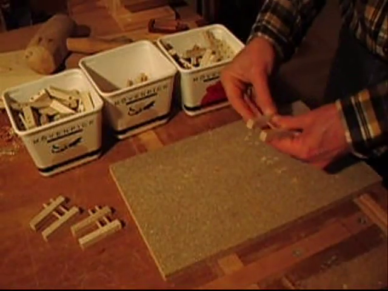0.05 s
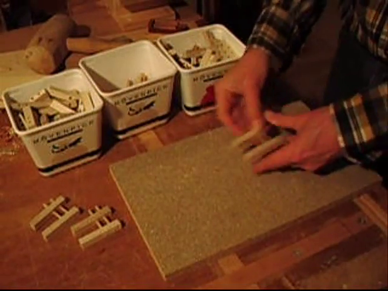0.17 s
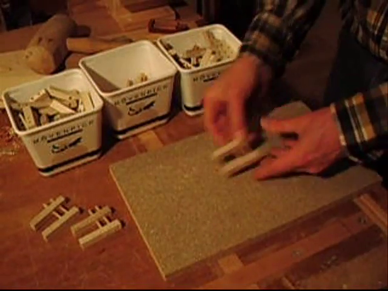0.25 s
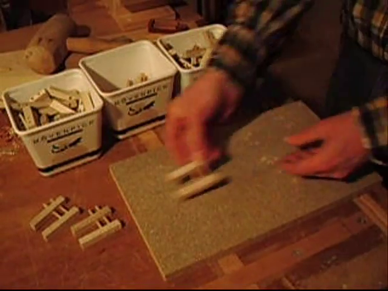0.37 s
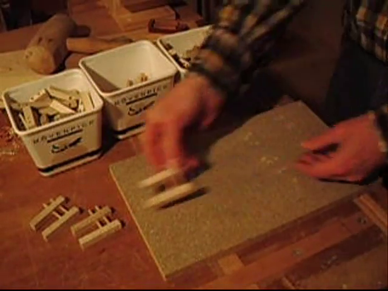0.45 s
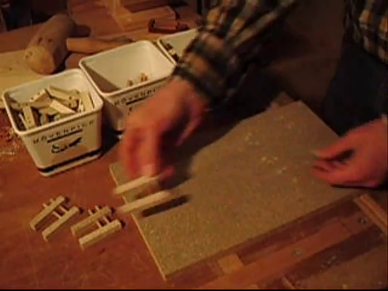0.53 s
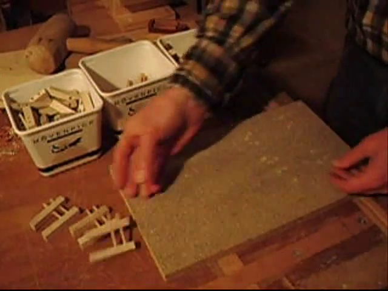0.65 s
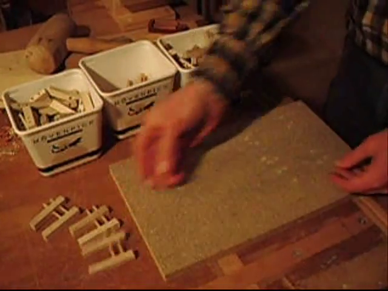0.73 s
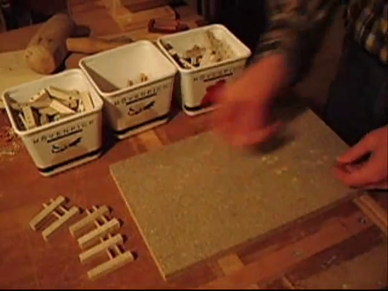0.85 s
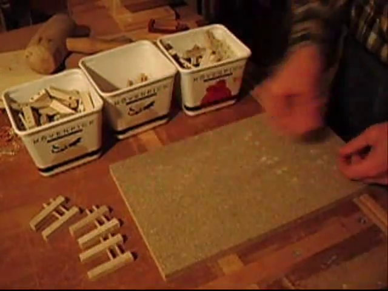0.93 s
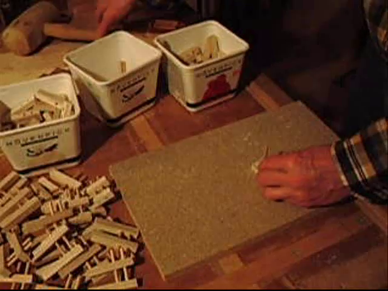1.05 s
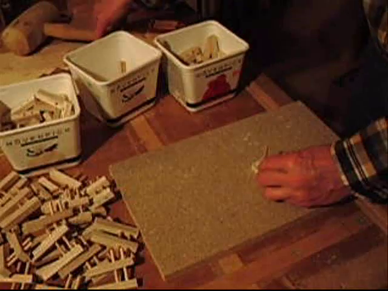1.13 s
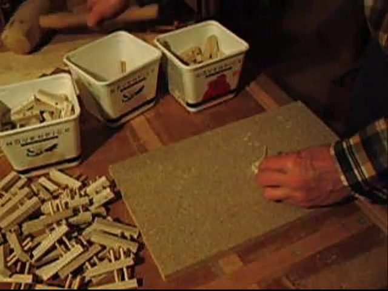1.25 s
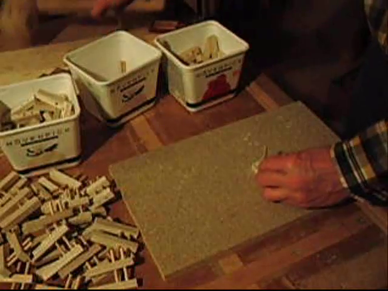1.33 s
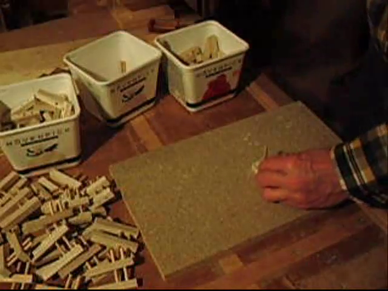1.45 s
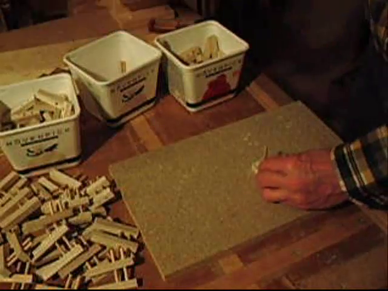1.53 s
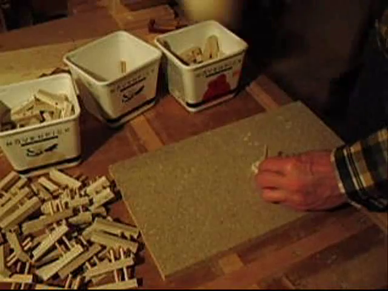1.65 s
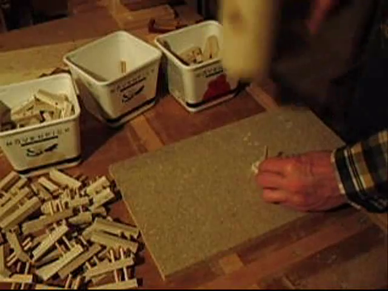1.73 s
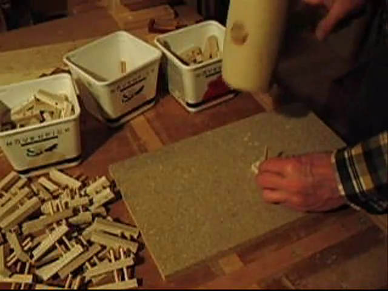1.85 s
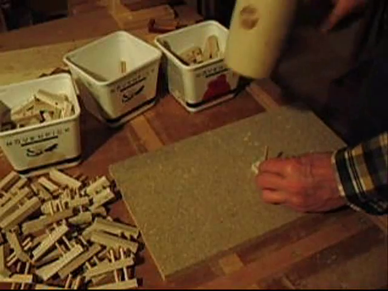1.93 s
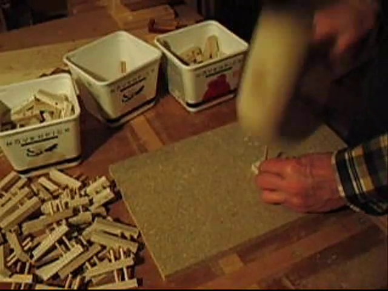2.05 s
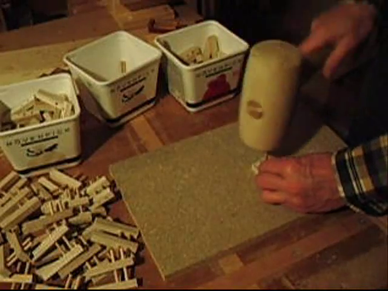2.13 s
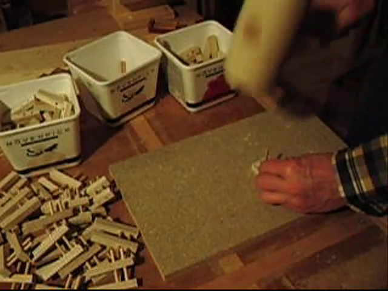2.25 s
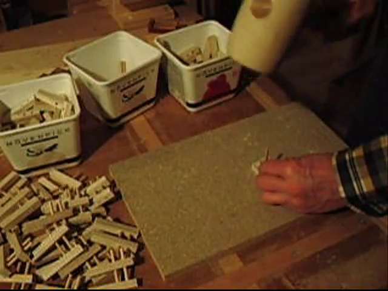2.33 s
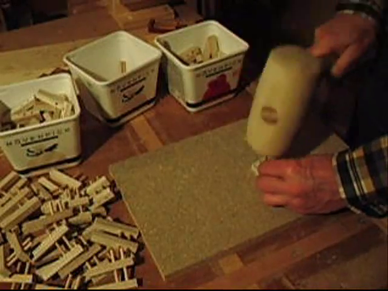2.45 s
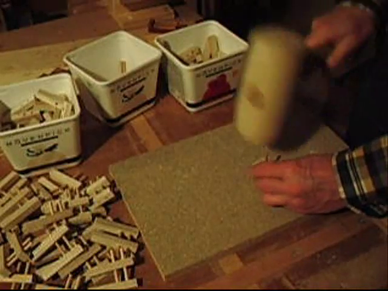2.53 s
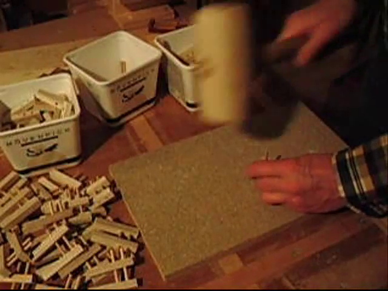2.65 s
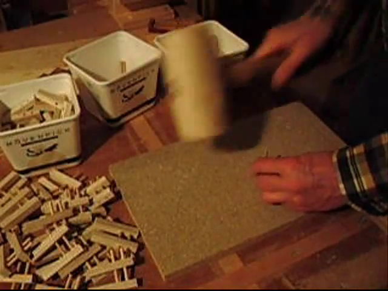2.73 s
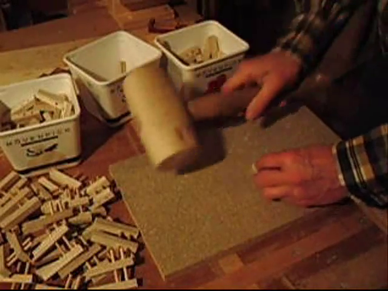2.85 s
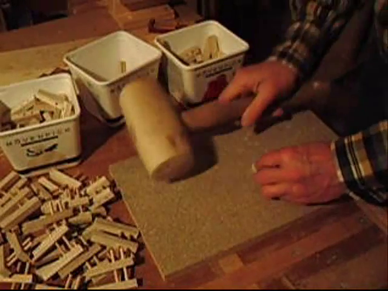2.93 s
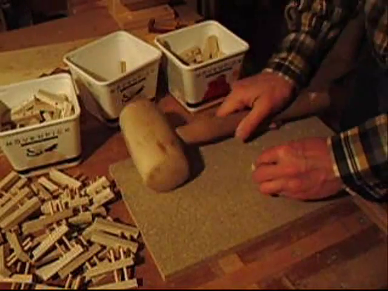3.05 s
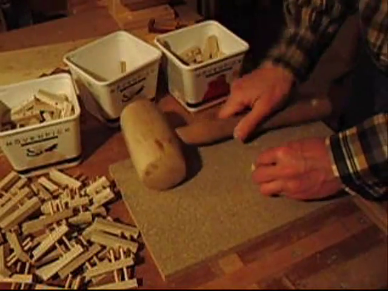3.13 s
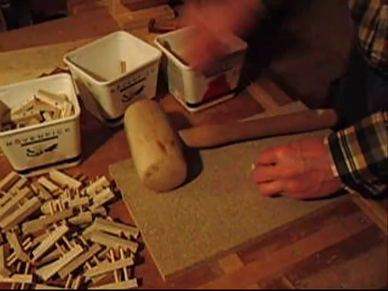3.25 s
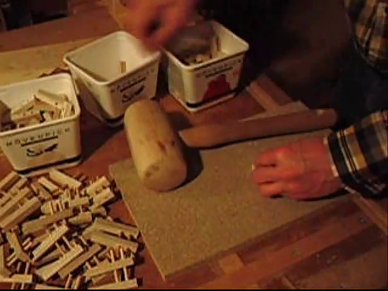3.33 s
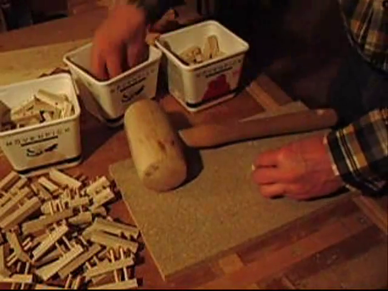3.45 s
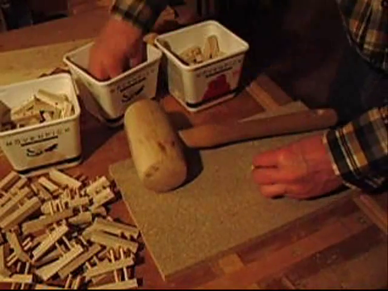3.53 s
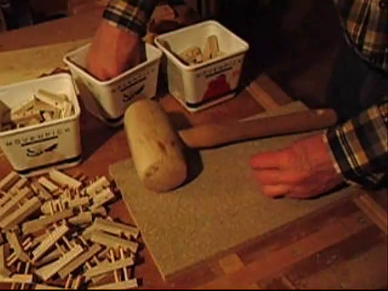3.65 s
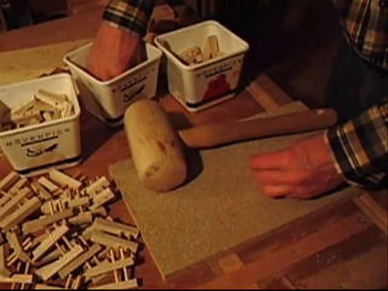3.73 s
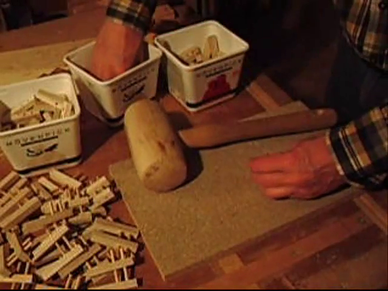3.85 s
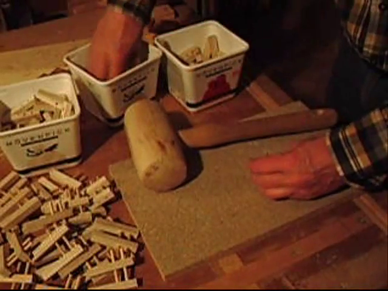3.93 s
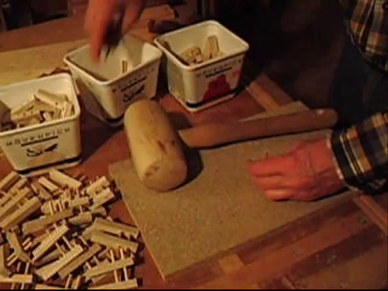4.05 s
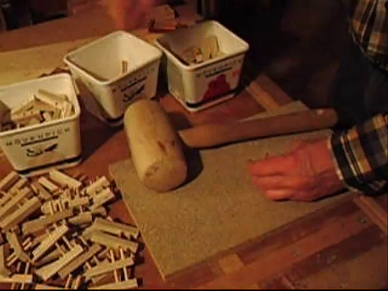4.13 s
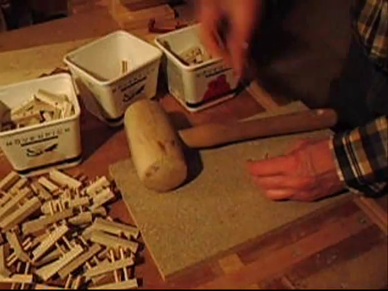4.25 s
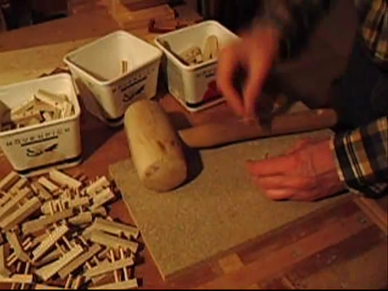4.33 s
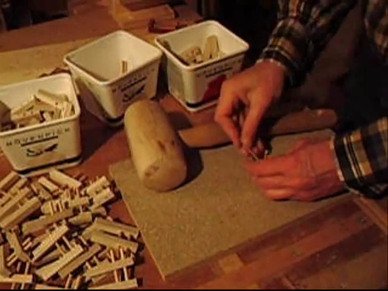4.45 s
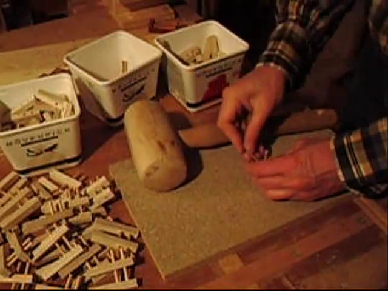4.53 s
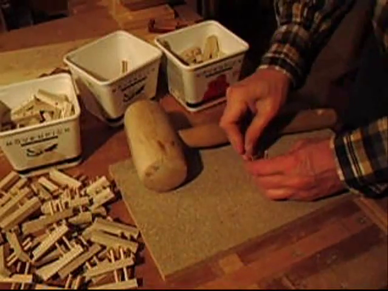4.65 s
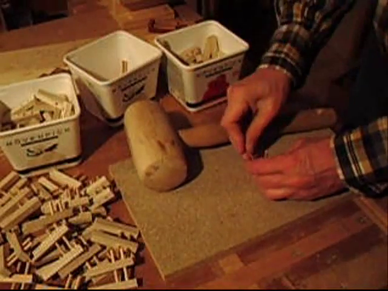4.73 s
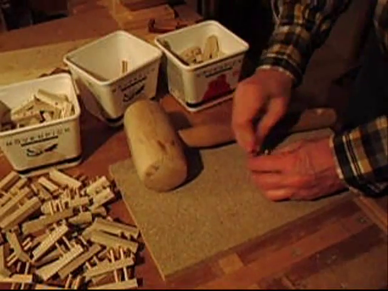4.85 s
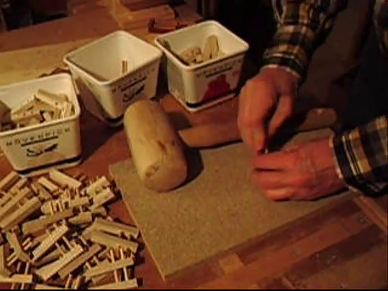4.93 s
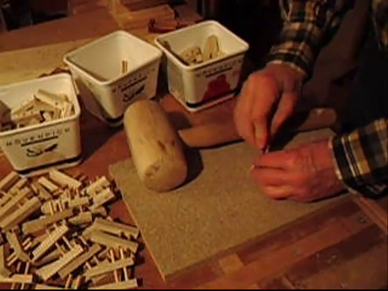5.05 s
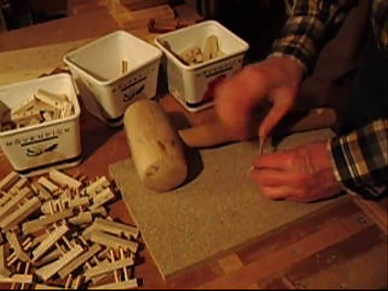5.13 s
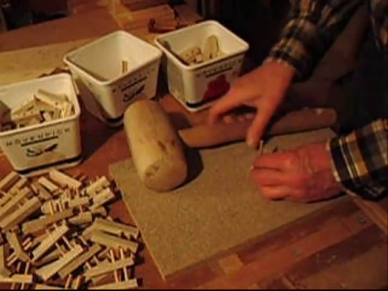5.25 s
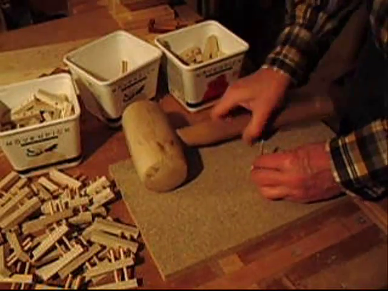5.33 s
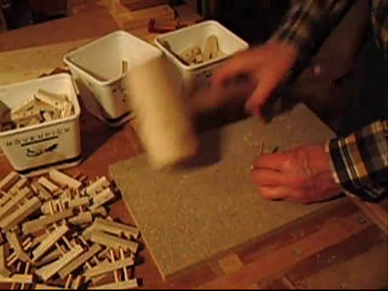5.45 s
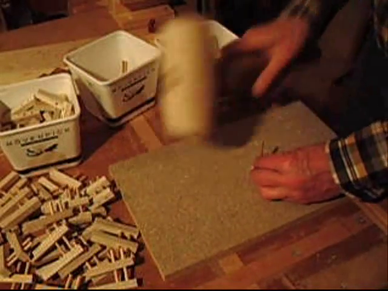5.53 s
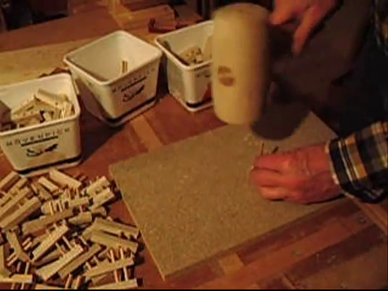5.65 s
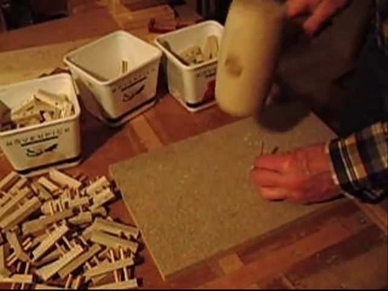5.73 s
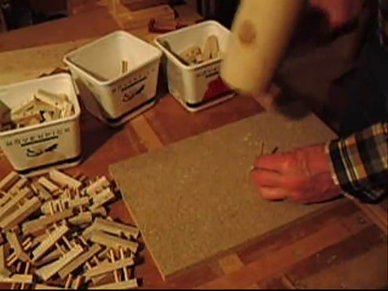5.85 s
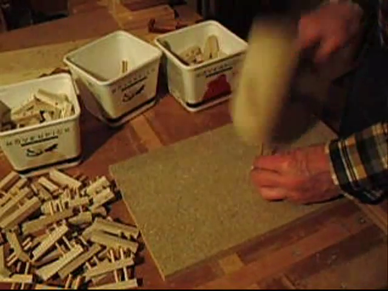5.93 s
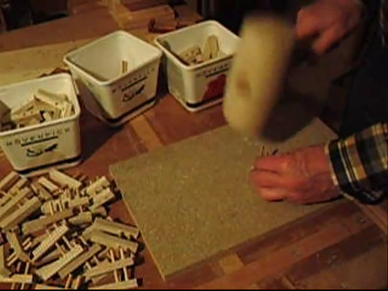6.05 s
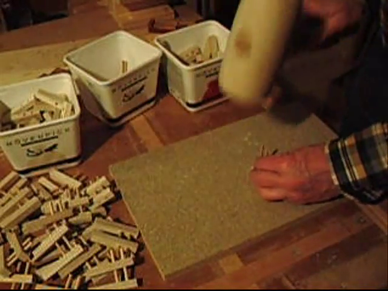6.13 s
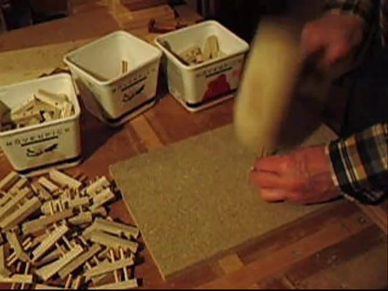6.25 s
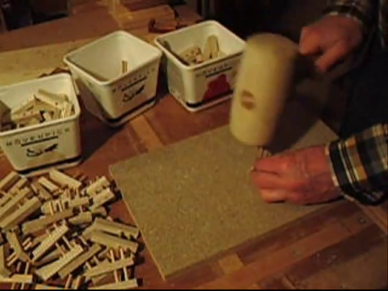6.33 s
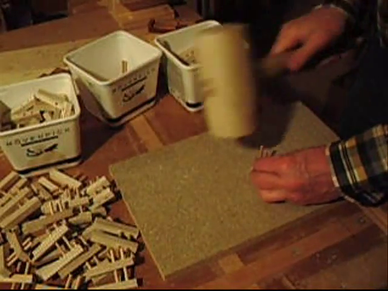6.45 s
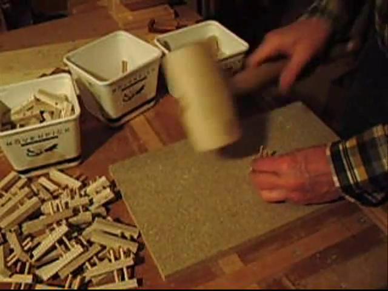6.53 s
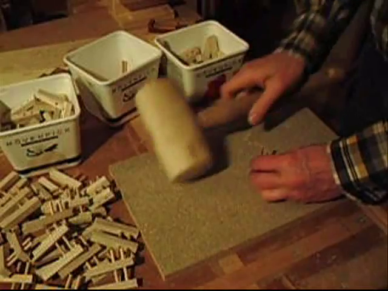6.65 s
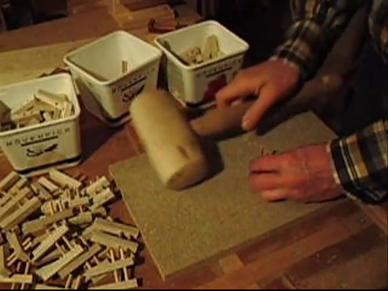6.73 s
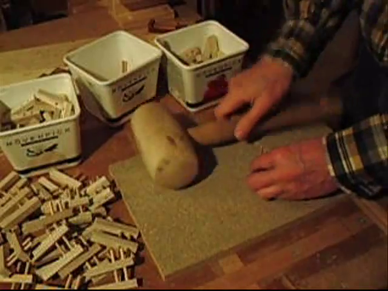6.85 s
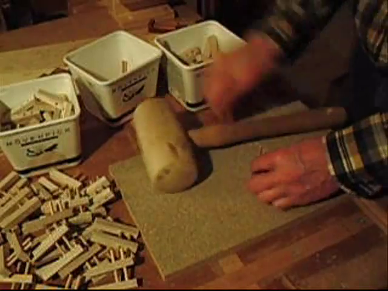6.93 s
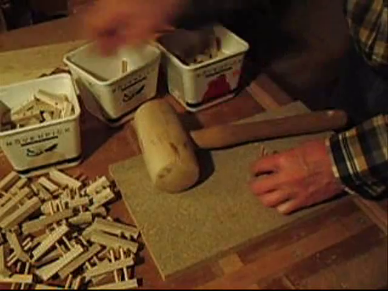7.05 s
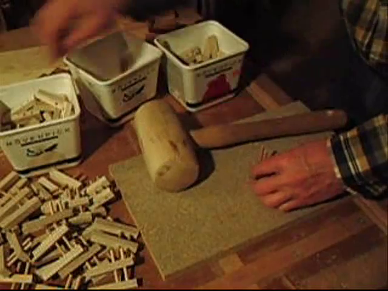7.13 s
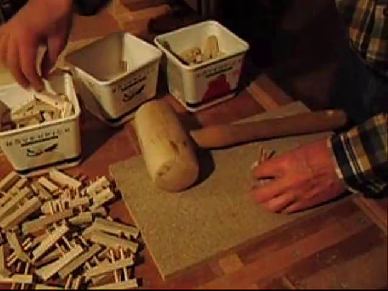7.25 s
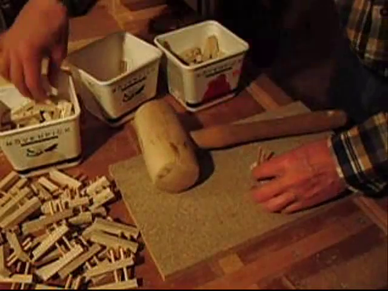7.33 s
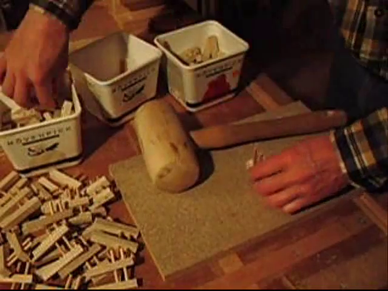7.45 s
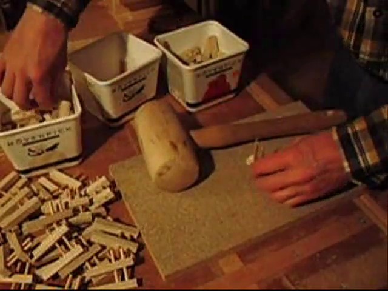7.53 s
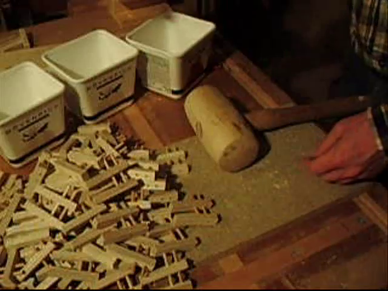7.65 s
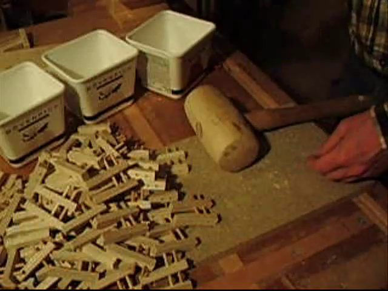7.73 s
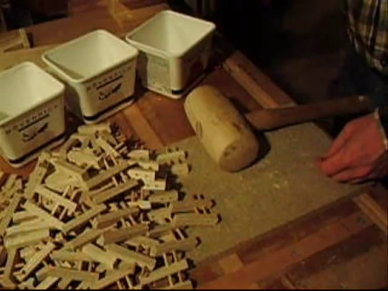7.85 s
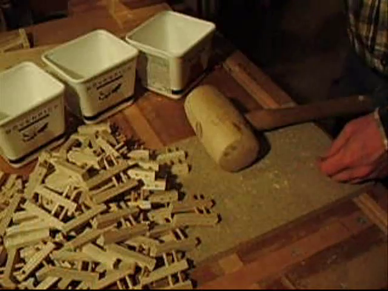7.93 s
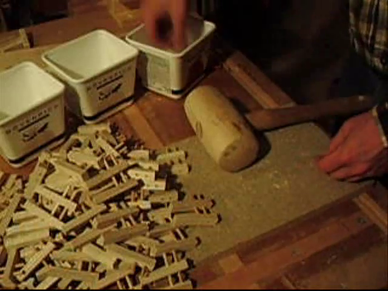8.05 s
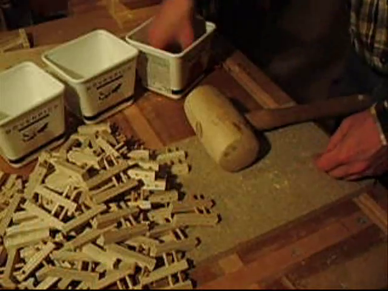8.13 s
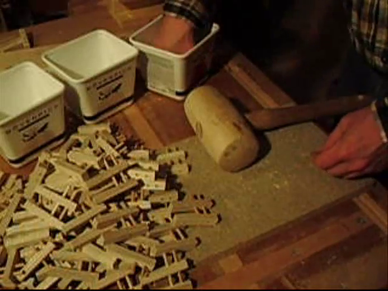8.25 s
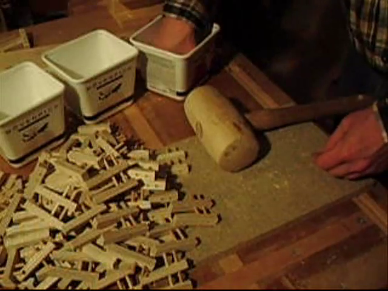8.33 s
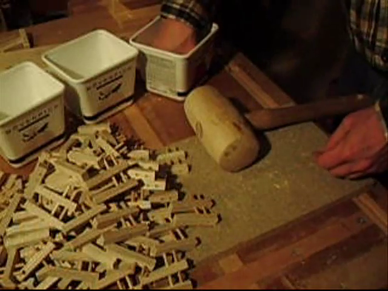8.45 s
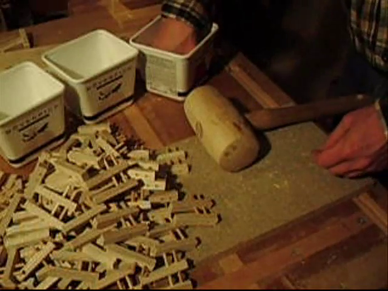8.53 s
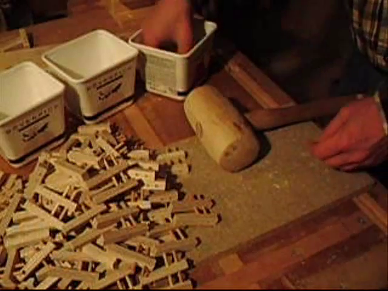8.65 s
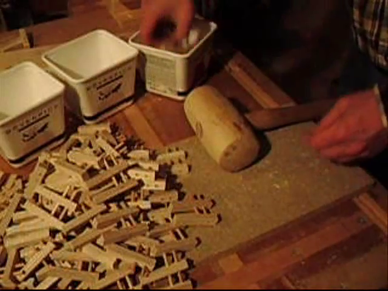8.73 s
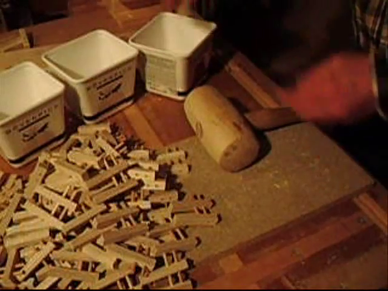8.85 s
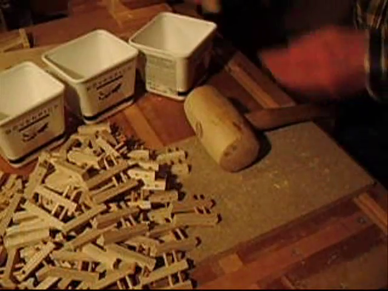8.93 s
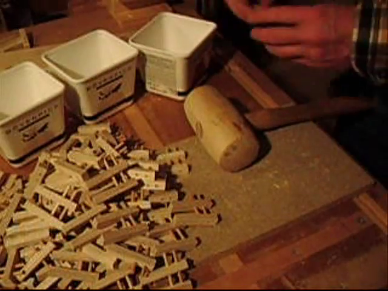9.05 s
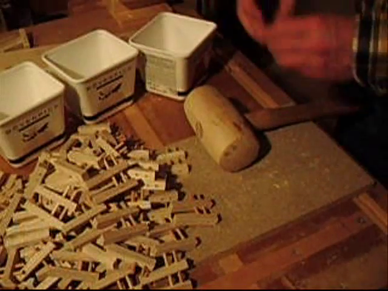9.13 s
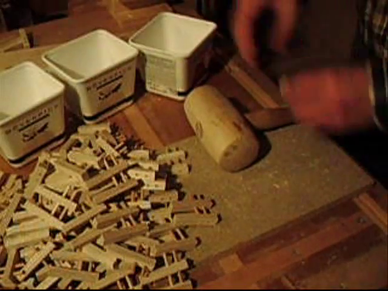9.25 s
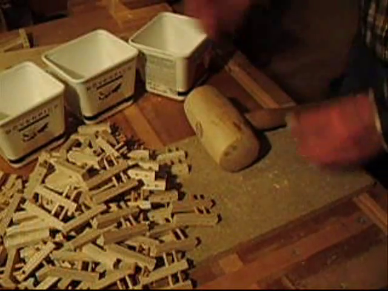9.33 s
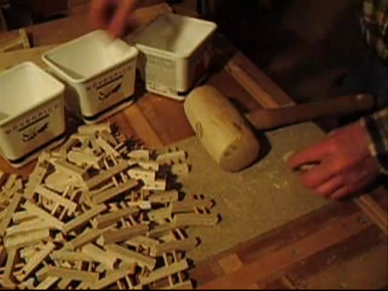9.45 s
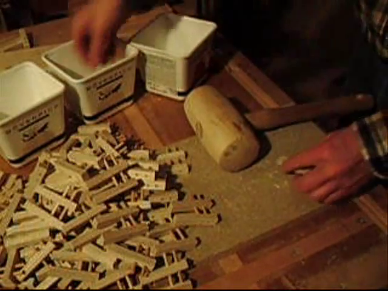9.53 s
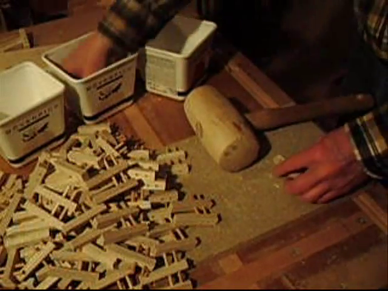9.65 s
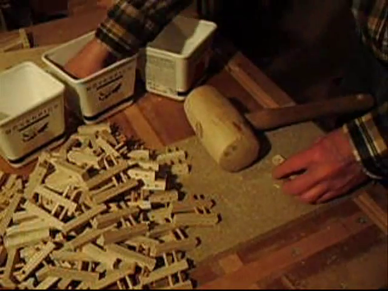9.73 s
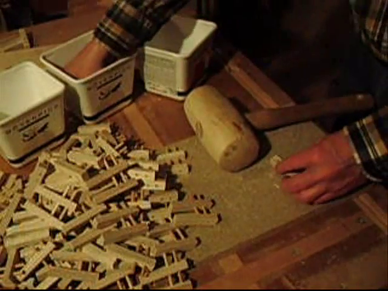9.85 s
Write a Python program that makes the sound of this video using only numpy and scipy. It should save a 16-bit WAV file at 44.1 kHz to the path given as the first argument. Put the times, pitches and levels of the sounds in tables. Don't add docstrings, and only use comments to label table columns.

```python
import sys
import numpy as np
from scipy import signal
from scipy.fft import rfft, irfft, next_fast_len
from scipy.io import wavfile

SR = 44100
rng = np.random.default_rng(int(sys.argv[2]) if len(sys.argv) > 2 else 0)


def gain_from_decibels(decibels):
    exponent = np.asarray(decibels, float) / 20
    return 10 ** exponent


def int16_out(signal):
    q = np.round(np.clip(np.atleast_2d(signal).T, -1, 1) * 32767)
    wavfile.write(sys.argv[1], SR, q.astype(np.int16))


N = 435708

# (time [s], peak level [dB], low modes re peak [dB], board note [Hz], board note level [dB])
BLOWS = [
    (2.241, -3, 1.5, 428, -1.5),
    (2.589, 5, -2, 340, -5.5),
    (6.09, -6, -6, 366, -8),
    (6.131, -22, 9.5, 313, 9.5),
    (6.425, 4, 1, 402, 8.5),
    (6.455, -11, 11, 430, -1),
]
# (frequency [Hz], width [Hz], level [dB])
BOARD_MODES = [(85, 73, 3), (181, 48, -41), (281, 17, 0.5), (390, 420, 7), (665, 380, -8),
               (1177, 270, -0.5), (1900, 294, -1.5), (3020, 1800, -3), (3660, 2670, -5)]


def mallet_blows():
    contacts = [0.006404 + 0.001 * row[1] / 10 for row in BLOWS]
    return knocks(BLOWS, BOARD_MODES, contacts, split_hz=550, gain_db=2.5, wet_db=-1.62, note_cycles=7.1)


def bench_thump():
    thump_hz, t60_s, level_db, rebound_db = 79.6, 0.18, -17, -10
    out, t = np.zeros(N), np.arange(SR // 3) / SR
    push = gain_from_decibels(level_db - 60 * t / t60_s) * np.sin(2 * np.pi * thump_hz * t)
    for s, db, *_ in BLOWS:
        if db > rebound_db:
            out[round(s * SR):][:len(t)] += push
    return out


# (time [s], peak level [dB], low modes re peak [dB])
HEAD = [
    (3.163, 4, -1.5),
    (3.209, -0.5, -0.5),
    (3.223, -4, -12),
    (6.834, 0, 3),
    (6.913, 0, -1),
    (6.946, -3, 3.5),
    (6.962, -14.5, 8),
]
# (frequency [Hz], width [Hz], level [dB])
HEAD_MODES = [(116.9, 290, -17.5), (184, 10.5, -9), (253.5, 12, 8.5), (430, 170, -0.5), (676, 37, 5),
              (745, 167, -4.5), (972, 68, -4.5), (1365, 33, -17.5), (1548, 79, -14), (1900, 940, -26.5),
              (3000, 1100, -30)]


def head_drops():
    return knocks(HEAD, HEAD_MODES, 0.00294, split_hz=550, gain_db=1.24, wet_db=-5)


# (time [s], peak level [dB], low modes re peak [dB])
HANDLE = [
    (3.311, 5, -2),
    (3.356, 1, -3),
    (3.382, -8.5, 2),
    (7.033, 4, 1),
    (7.053, -20, 20),
    (7.1, -13, 10.5),
    (7.136, -7.5, 1.5),
    (7.156, -19, 13.5),
]
# (frequency [Hz], width [Hz], level [dB])
HANDLE_MODES = [(96.5, 85, -8.5), (240, 42, 7.5), (429, 140, 4.5), (1000, 144, 1.5), (1208, 77, 5),
                (1357, 43, 4), (1663, 62, 0), (2010, 250, -5), (3000, 980, -13)]


def handle_slaps():
    return knocks(HANDLE, HANDLE_MODES, 0.00323, split_hz=600, gain_db=-4.0, wet_db=-5.5)


# (frequency [Hz], width [Hz], level [dB])
ROCK_MODES = [(130, 50, -18), (172, 26, -2), (265, 78, 0.5), (340, 88, -0.5), (674, 350, -21.5)]
# (first touch [s], peak level [dB], touches [count])
ROCK = [
    (5.512, -30.5, 1),
    (7.269, -33.5, 7),
]


def rocking_head():
    period_s, back_s, low_db = 0.133, 0.055, -6.5
    touches = []
    for s, db, count in ROCK:
        for k in range(round(count)):
            touches.append((s + k // 2 * period_s + k % 2 * back_s, db, low_db))
    return knocks(touches, ROCK_MODES, 0.0031, split_hz=230, gain_db=0.0, wet_db=-1)


# (time [s], peak level [dB], low modes re peak [dB], own note [Hz], note level [dB])
PART = [
    (0.763, -4, -7.5, 1070, -10),
    (0.771, -11, -5.5, 3080, 5),
    (0.790, -6.5, -10, 3200, -1),
    (0.845, -20, -5.5, 3000, 2),
    (0.875, -14.5, -10, 2020, -3),
    (0.878, -11.5, -11.5, 3100, 12),
    (0.943, -27, 1, 1000, 1.5),
    (0.977, -27.5, -8.5, 1030, -15),
]
# (frequency [Hz], width [Hz], level [dB])
PART_MODES = [(296, 90, -11.5), (449, 45, -2.5), (725, 61, 7), (1070, 280, 0), (1510, 190, 1),
              (1980, 590, -1), (3410, 670, -3)]


def tossed_part():
    return knocks(PART, PART_MODES, 0.00503, split_hz=900, gain_db=0.5, wet_db=-4.0, note_cycles=14.6)


# (time [s], peak level [dB], low modes re peak
# [dB], own note [Hz], note level [dB])
TICKS = [
    (1.219, -42, -7, 1900, 0),
    (1.307, -36, -14, 1110, -15),
    (3.032, -32.5, -32, 3650, 5),
    (4.812, -24, -15, 2180, 15),
    (5.398, -46, -10, 457, 9),
    (5.412, -24, -5.5, 430, 12),
    (9.788, -22.5, -9.5, 2340, 13),
]


def peg_ticks():
    return knocks(TICKS, PART_MODES, 0.0041, split_hz=900, gain_db=2.0, wet_db=-4.5, note_cycles=3.7)


# (time [s], peak level [dB], low modes re peak [dB], contact [s])
TUB = [(3.676, -6.5, -2, 0.013), (3.6995, -7.5, -11, .01), (3.7124, -24, -6, 0.0066),
       (3.7289, -13, 0.5, 0.0117), (3.7594, -25, 4, .005), (3.8112, -9, -4.5, 0.0066),
       (3.8224, -15.5, 3.5, 0.00537), (3.834, -19.5, 5, 0.0047), (3.8686, -28, 4.5, 0.0036),
       (3.894, -15.5, 0.5, 0.0061), (3.9105, -25, -5, 0.0048), (3.9544, -22, 0.5, .004),
       (3.9774, -29.5, 6.5, 0.00416), (3.9968, -27, 2, 0.00794), (4.16, -37, 4.5, .012),
       (7.59, -33.5, 7, .01), (7.6414, -37, 5, 0.0038), (7.6715, -29, 2, 0.0044), (8.481, -19, -2, .008),
       (8.4926, -20, -2, 0.0094), (8.76, -28, -12, 0.0091), (9.819, -34, 6, 0.00495),
       (9.825, -14.5, 1, 0.0112), (9.8328, -23.5, 9, 0.00424), (9.8383, -14.5, -11, 0.00775),
       (9.862, -32, -6, 0.0074)]
# (frequency [Hz], width [Hz], level [dB])
TUB_MODES = [(355, 97, 1.5), (574, 300, -5), (880, 210, 22), (1970, 120, -21), (2470, 5000, 0),
             (3200, 7200, 46)]


def tub_knocks():
    contacts = [row[3] for row in TUB]
    return knocks([row[:3] for row in TUB], TUB_MODES, contacts, split_hz=1200, gain_db=-2.5, wet_db=-2.5)


# (time [s], peak level [dB], low modes re peak [dB])
BUMP = [
    (8.294, -31.5, 7.5),
    (8.3344, -46, 15),
    (8.3584, -32, 5.5),
    (8.3764, -38, 0),
]
# (frequency [Hz], width [Hz], level [dB])
BUMP_MODES = [(256, 150, -3), (454, 210, -2), (754, 200, 4), (1410, 440, 0), (2960, 1200, -2)]


def tub_bumps():
    return knocks(BUMP, BUMP_MODES, 0.00173, split_hz=1100, gain_db=5.5, wet_db=-2.5)


# (deepest [s], rattle level [dB], swell [s], fade [s], tub boom re rattle [dB])
RAKE = [
    (3.703, -26.5, 0.0085, 0.069, 1.5),
    (3.82, -29.5, 0.07, 0.19, -3.5),
    (7.68, -50, 0.5, 0.026, 10),
    (8.366, -46, 0.14, 0.37, -3),
    (8.488, -31, 0.024, 0.058, -7.5),
    (8.76, -48.5, 0.13, .1, -2),
    (9.843, -39, 0.029, 0.18, 9.5),
]
# (frequency [Hz], width [Hz], level [dB])
RATTLE = [(1740, 980, -8), (2640, 800, 3), (3290, 270, 3)]
# (frequency [Hz], width [Hz], level [dB])
BOOM = [(330, 400, -8), (605, 230, -5), (832, 118, -1)]


def raking():
    effort = strokes(RAKE)
    hits = rng.random(N) < 1800 / SR
    strength = gain_from_decibels(3.5 * np.minimum(rng.exponential(size=N), 2))
    ticks = hits * strength * rng.standard_normal(N)
    ticks = ticks + 0.66 * signal.fftconvolve(ticks, echo())[:N]
    rattle = unit(filtered(ticks, resonances(RATTLE)))
    boom = unit(filtered(ticks, resonances(BOOM)))
    boom_effort = gain_from_decibels([row[-1] for row in RAKE]) @ effort
    return effort.sum(0) * rattle + boom_effort * boom


# (firmest [s], level [dB], swell [s], fade [s])
SCUFF = [
    (1.68, -43.5, 0.13, 0.064),
    (2.95, -46.5, 0.69, 0.1),
    (5.52, -51, 0.49, .06),
    (5.68, -47, .2, 0.02),
    (6.67, -45.5, 0.24, 0.18),
]


def palm_scuff():
    hiss = unit(filtered(rng.standard_normal(N), resonances([(3400, 450, 0)])))
    patches = gain_from_decibels(-5 + 4 * wobble(40))
    return strokes(SCUFF).sum(0) * patches * hiss


def knocks(events, modes, contacts, split_hz, gain_db, wet_db, note_cycles=12, size=8192):
    out = np.zeros(N + SR)
    hz, t = np.fft.rfftfreq(size, 1 / SR), np.arange(size) / SR
    kept = size * 3 // 4
    for (s, db, low_db, *note), contact in zip(events, np.broadcast_to(contacts, len(events))):
        shape = [(c, w, g + rng.normal(0, 1)) for c, w, g in modes]
        low_modes = [m for m in shape if m[0] < split_hz]
        high_modes = [m for m in shape if m[0] >= split_hz]
        shove = np.exp(-2j * np.pi * hz * 0.3934 * contact) / (1 + 0.4j * hz * contact)
        rasp = contact_force(np.clip(contact, 0.0005, 0.012), size)
        low = irfft(resonances(low_modes)(hz) * shove)
        high = irfft(resonances(high_modes)(hz) * rasp)
        body = high / np.abs(high).max() + gain_from_decibels(low_db) * low / np.abs(low).max()
        ring = 0 * t
        if note:
            note_hz, note_db = note
            swell = 1 - np.exp(-(t / (0.5 * contact)) ** 2)
            decay = gain_from_decibels(-20 * t * note_hz / note_cycles)
            ring = gain_from_decibels(note_db) * swell * decay * np.sin(2 * np.pi * note_hz * t)
        direct = gain_from_decibels(db + gain_db) * (body + ring)[:kept]
        spread = gain_from_decibels(db + gain_db + wet_db) * (body + 0.49 * ring)[:kept]
        reflected = signal.fftconvolve(spread, echo())
        start = round(s * SR)
        out[start:][:len(direct)] += direct
        out[start:][:len(reflected)] += reflected
    return out[:N]


def contact_force(seconds, size):
    u = np.arange(2048) / (2 * seconds * SR)
    swell = u * np.exp(-7 * u)
    force = rng.standard_normal(2048)
    for _ in range(4):
        z = rfft(force * swell)
        force = irfft(z / (np.abs(z) + 1e-9))
    return rfft(force, size)


def resonances(modes):
    def response(f):
        total = 0
        for k, (c, w, db) in enumerate(modes):
            total = total + (-1) ** k * gain_from_decibels(db) * 1j * f * w / (c * c - f * f + 1j * f * w)
        return total
    return response


def filtered(x, response):
    m = next_fast_len(len(x) + 8192)
    return irfft(rfft(x, m) * response(np.fft.rfftfreq(m, 1 / SR)), m)[:len(x)]


def strokes(rows):
    t = np.arange(N) / SR
    return np.array([gain_from_decibels(db - 20 * np.maximum((s - t) / abs(rise), (t - s) / abs(fall)))
                     for s, db, rise, fall, *_ in rows])


def unit(x):
    return x / np.sqrt(np.mean(x ** 2) + 1e-20)


def along(points, hz):
    f, v = np.transpose(points)
    return np.interp(np.log(hz + 1), np.log(f + 1), v)


def wobble(rate):
    knots = rng.standard_normal(int(N * rate / SR) + 2)
    return np.interp(np.arange(N) * rate / SR, np.arange(len(knots)), knots)


# (frequency [Hz], decay by 60 dB [s])
SHOP = [(60, 0.42), (250, 0.32), (700, 0.33), (2000, 0.28), (4000, 0.31)]


def echo(size=SR // 3):
    hz, t, z = signal.stft(rng.standard_normal(size), SR, nperseg=512)
    decay = gain_from_decibels(-60 * t / along(SHOP, hz)[:, None])
    tail = signal.istft(z * decay, SR, nperseg=512)[1][:size]
    tail = tail * np.clip(np.arange(size) / SR / 0.0011, 0, 1)
    return tail / np.linalg.norm(tail)


# (frequency [Hz], density [dB per Hz])
AIR = [(12, -13), (20, -2.5), (59, -5), (75, -9.5), (256, -10.5), (410, -16.5), (548, -13.5), (600, -17),
       (820, -18), (1310, -21), (1440, -20.5), (4200, -27), (5460, -15), (9240, -120)]
# (frequency [Hz], rms level [dB])
WHINE = [(102.3, -56), (269.2, -60), (570.6, -62.5), (839.8, -63.5), (1109, -63.5), (1254, -80),
         (1410, -66.5), (1680, -83), (2503, -89.5), (2815, -73), (3365, -68)]


def background():
    noise_db, rumble_db, drop_db = -50.5, -53.5, -8
    t = np.arange(N) / SR
    away = (t > 1.1) & (t < 7.7)
    noise = unit(filtered(rng.standard_normal(N), lambda hz: gain_from_decibels(along(AIR, hz))))
    rumble = unit(filtered(rng.standard_normal(N), resonances([(56.0, 9, 0)])))
    rumble = rumble + 2.1 * np.sin(2 * np.pi * 53 * t + 0.92 * wobble(6.5))
    lines = np.zeros(N)
    for hz, db in WHINE:
        lines += gain_from_decibels(db + 1.1 * wobble(4.3)) * np.sin(2 * np.pi * hz * t + 2.2 * wobble(14))
    noise = gain_from_decibels(noise_db + 3 + 1.1 * wobble(10)) * noise
    return noise + gain_from_decibels(rumble_db - 2.5 + drop_db * away) * rumble + 1.13 * lines


def scene():
    mallet = mallet_blows() + rocking_head() + head_drops() + handle_slaps()
    parts = tossed_part() + peg_ticks() + tub_knocks() + tub_bumps()
    wood = filtered(mallet + parts, lambda hz: (1j * hz / (55 + 1j * hz)) ** 2)
    return (wood + bench_thump() + raking() + palm_scuff() + background())[None]


def top_cut(x):
    return signal.sosfilt(signal.butter(12, 16730, fs=SR, output="sos"), x)


def record(dry):
    hold_hz, top_hz = 8013, 15400
    x = signal.sosfilt(signal.butter(5, 3800, fs=SR, output="sos"), dry[0])
    x = x / (1 + np.abs(x / 0.97) ** 12) ** (1 / 12)
    step = np.floor(np.arange(N) * hold_hz / SR)
    x = np.interp(step * SR / hold_hz, np.arange(N), x)
    x = filtered(x, lambda hz: hz < top_hz)
    mix = np.clip(x, -1, 1)[None]
    return top_cut(mix)


dry = scene()
out = record(dry)
int16_out(out)
```